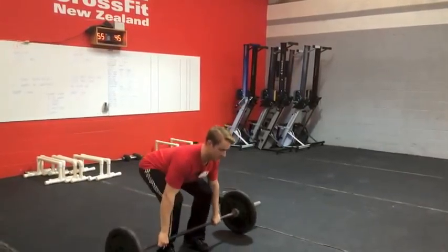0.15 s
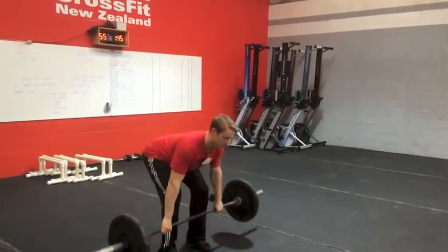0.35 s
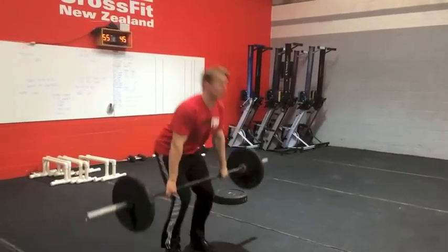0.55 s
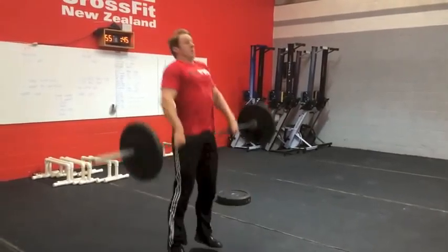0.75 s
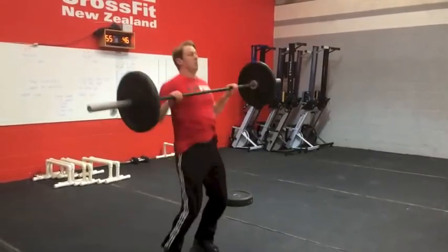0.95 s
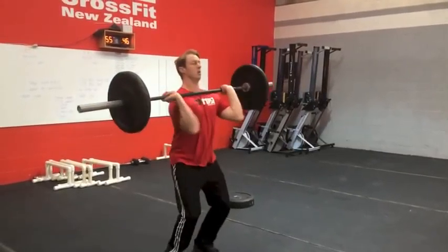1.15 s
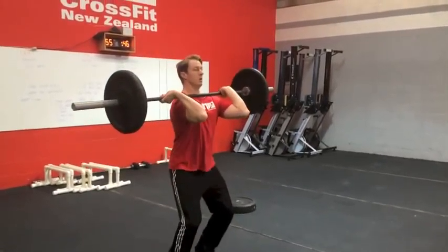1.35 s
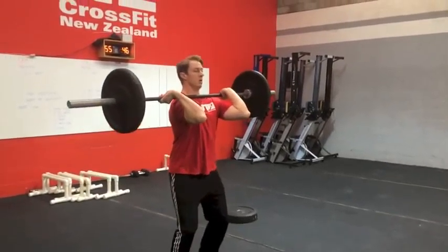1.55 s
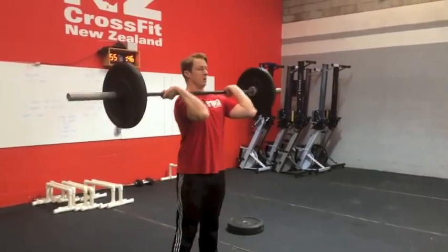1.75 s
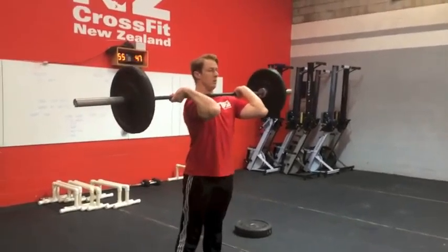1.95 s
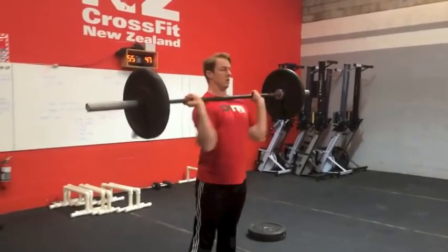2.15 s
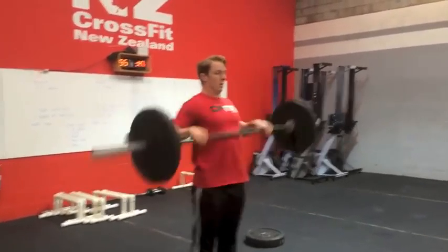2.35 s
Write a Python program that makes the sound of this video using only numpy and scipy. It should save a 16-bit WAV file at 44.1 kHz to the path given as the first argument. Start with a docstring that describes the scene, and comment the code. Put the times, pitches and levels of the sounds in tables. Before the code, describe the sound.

Over low ventilation rumble, barbell sleeves and plates clank hard and rattle away, feet slap the floor, the bar settles quietly, and duller clinks end it, heard by a mono microphone in a large ringing room.

```python
"""First a low ventilation rumble and the last of an earlier clank, dying away in a large hard gym hall.
Then a loaded barbell leaves the rubber floor: slack sleeves and plate hubs clank hard and rattle on, the shoes
stamp down under the catch, and the steel clinks as the bar settles and later leaves the shoulders.
Air is shaped noise, steel is random impacts on a ringing body, shoes and floor are short decaying tones.
One mono pickup takes the direct sounds and the hall, which rings for about a second."""
import sys
import numpy as np
from scipy import signal
from scipy.io import wavfile
from scipy.ndimage import uniform_filter1d

SR = 44100
rng = np.random.default_rng(int(sys.argv[2]) if len(sys.argv) > 2 else 0)


def wav_out(sig):
    """Save sig, one row per channel (or a flat mono array), as 16-bit PCM at SR to the path in sys.argv[1]."""
    wavfile.write(sys.argv[1], SR, np.round(np.clip(np.atleast_2d(sig).T, -1, 1) * 32767).astype(np.int16))


def volts(x):
    """Linear amplitude factor 10**(x/20) for a level x in dB, scalar or array-like."""
    e = np.asarray(x, float) / 20
    return 10 ** e


N = 110250  # 2.5 s


def evened(x):
    """Scales a signal to rms 1."""
    return x / np.sqrt(np.mean(x ** 2) + 1e-20)


def read(points, hz):
    """Reads a (Hz, value) table along log frequency."""
    f, value = np.transpose(points)
    return np.interp(np.log(hz + 1), np.log(f + 1), value)


def add(mix, s, sound):
    """Mixes a sound in at s seconds, cut off at the end of the mix."""
    part = mix[round(s * SR):][:len(sound)]
    part += sound[:len(part)]


def causal(db):
    """Minimum-phase impulse response, energy first, of a gain in dB on 1025 bins."""
    both_sides = np.r_[db, db[-2:0:-1]]
    log_gain = np.log(volts(np.maximum(both_sides, -100)))
    return np.fft.ifft(np.exp(np.conj(signal.hilbert(log_gain)))).real[:1024]


def dulled(x, db_per_octave, ring_hz=1000, ring_db=0):
    """Tilts the treble above 1 kHz and lifts a narrow region around one ring."""
    width_octaves = 0.23
    octave = np.log2(np.fft.rfftfreq(2048, 1 / SR) / 1000 + 1e-3)  # octaves above 1 kHz
    bump = np.exp(-.5 * ((octave - np.log2(ring_hz / 1000)) / width_octaves) ** 2)
    gain_db = db_per_octave * np.maximum(octave, 0) + ring_db * bump
    return signal.oaconvolve(x, causal(gain_db))


# Colour of the ventilation air in the hall, before its overall level is set.
# Each row: frequency in Hz, relative density in dB per Hz.
AIR_COLOUR = [(12, -59.5), (20, -18), (92, -0.5), (202, -5.5), (324, -16.5), (352, -15.5), (597, -21),
              (649, -19.5), (1230, -23.5), (2030, -22.5), (2540, -33.5), (2760, -30.5), (5380, -38.5),
              (13900, -44), (15500, -48.5)]


def ventilation():
    """Steady noise, mostly rumble, a little patchy over time and frequency."""
    level_db, patchy_db, swell_db = -56, .8, .3
    frames, hz = N // 512 + 5, np.fft.rfftfreq(2048, 1 / SR)
    real, imaginary, patches = rng.standard_normal((frames, 1025, 3)).T
    patches = uniform_filter1d(patches, size=10, axis=0)  # across frequency
    patches = evened(uniform_filter1d(patches, size=6, axis=1))  # across time
    swell = evened(uniform_filter1d(rng.standard_normal(frames), size=12))
    gain_db = read(AIR_COLOUR, hz)[:, None] + patchy_db * patches + swell_db * swell
    spectrum = (real + 1j * imaginary) * volts(gain_db)
    noise = signal.istft(spectrum, nperseg=2048, noverlap=1536)[1][:N]
    return volts(level_db) * evened(noise)


# Contact colour of steel on steel, shared by the earlier clank and the barbell at hand.
# Each row: frequency in Hz, relative density in dB per Hz.
STEEL_COLOUR = [(150, -43.5), (300, -24), (450, -17), (600, -9), (900, -18), (1050, -9.5), (1250, -8.5),
                (1370, -11.5), (1800, -2.5), (2300, -8), (2900, -6), (4200, -9), (4900, -7), (5500, -9),
                (5800, -12), (6300, -10.5), (7000, -11.5), (7600, -14), (7950, -13.5), (10100, -20),
                (12000, -17.5), (13400, -37), (14300, -18), (15500, -37)]


def steel_click():
    """The bright, short response of one steel contact."""
    return causal(read(STEEL_COLOUR, np.fft.rfftfreq(2048, 1 / SR)))


def earlier_ring():
    """The hall still dying away from an earlier clank: dulled steel-coloured noise, fading."""
    start_db, t60_s, dull_db_per_octave = -65, 1.8, -2.5
    noise = signal.oaconvolve(rng.standard_normal(N), steel_click())
    wash = dulled(noise, dull_db_per_octave)[:N]
    return volts(start_db - 60 * np.arange(N) / SR / t60_s) * evened(wash)


# How long the hall holds each band; anything under 0.05 s is raised to that.
# Each row: frequency in Hz, decay time t60 in seconds before the early boost.
HALL_DECAY = [(120, .4), (300, 1.9), (700, 1.186), (1500, 0.96), (3000, 1.457), (5000, 1.297), (8000, 0.95),
              (12000, 0.52), (15000, 0.3)]
# Single echoes off the hall's walls.
# Each row: delay in seconds, level in dB before the bass is thinned.
WALL_ECHOES = [(.0065, -15.5), (.0212, -7.5), (.031, -10.5), (.037, -12), (.044, -15.5), (.057, -13)]


def hall(x):
    """Single wall echoes and a dense tail whose bands die at their own speeds."""
    wet_db, gap_s, build_s = -2, .012, 0.0027
    early_db, early_s = 7, .04  # the first reflections stand above the late tail and fall away faster
    tail = np.zeros(2 * SR)
    slots = np.arange(0, 2 * SR - 20, 20)
    # one reflection of random sign somewhere in every 20 samples
    tail[slots + rng.integers(0, 20, len(slots))] = rng.choice([-1., 1.], len(slots))
    hz, t, z = signal.stft(tail, SR, nperseg=512)
    t60 = np.maximum(read(HALL_DECAY, hz), .05)[:, None]
    tail = signal.istft(z * volts(-60 * t / t60), SR, nperseg=512)[1]
    t = np.arange(len(tail)) / SR
    tail = tail * (1 - np.exp(-np.maximum(t - gap_s, 0) / build_s))
    tail = tail * volts(early_db * np.exp(-t / early_s))
    tail = volts(wet_db) * tail / np.linalg.norm(tail)
    soft_tap = np.r_[.25, .5, .25, np.zeros(200)]
    echo = signal.lfilter(*signal.butter(2, 1370, "high", fs=SR), soft_tap)  # walls return little bass
    for k, (s, db) in enumerate(WALL_ECHOES):
        add(tail, s, (-1) ** k * volts(db) * echo)
    return signal.fftconvolve(x, tail)[:N]


# The plates and floor flex as the load is taken up.
# Each row: start in seconds, level in dB before the soft onset and gain, pitch in Hz, t60 in seconds.
FLEXES = [(.216, -39.5, 170, 0.11), (0.223, -41, 298.3, 0.063), (.236, -36, 125, 0.11),
          (.254, -34.5, 190, .1), (.272, -24.5, 105, 0.052)]


def thuds():
    """Plates and floor flexing: low decaying tones with a soft onset."""
    out, t = np.zeros(N), np.arange(SR // 2) / SR
    for s, db, hz, t60 in FLEXES:
        onset = 1 - np.exp(-t / 0.016)
        add(out, s, 4 * volts(db - 60 * t / t60) * onset * np.sin(2 * np.pi * hz * t))
    return out


# Short dull knocks of shoes and rubber on the floor.
# Each row: start in seconds, level in dB before doubling, pitch in Hz, t60 in seconds,
# level of the snap in dB before it is coloured.
SHOE_KNOCKS = [(0.2189, -14, 860, 0.0045, -26), (.2222, -16, 636, 0.003, -50),
               (0.9807, -25, 911, 0.0054, -37), (0.996, -16.5, 1180, 0.0033, -15.5),
               (2.3452, -43, 650, 0.0088, -47.5)]


def knocks():
    """Shoes and rubber: a fast-dying low tone with a tiny bright snap."""
    out, t = np.zeros(N), np.arange(SR // 20) / SR
    tap = 1. * (np.arange(len(t)) == 8)
    for s, db, hz, t60, snap_db in SHOE_KNOCKS:
        snap = volts(snap_db) * dulled(tap, -2, ring_hz=3800, ring_db=7)[:len(t)]
        onset = np.minimum(t * hz * 2, 1)  # half a cycle
        tone = 2 * volts(db - 60 * t / t60) * onset * np.sin(2 * np.pi * hz * t)
        add(out, s, tone + snap)
    return out


# Modes of the bar and hubs, before the hands limit how long they ring.
# Each row: frequency in Hz, relative level in dB, t60 in seconds.
STEEL_MODES = [(1830, -11.5, 0.42), (2750, -10, 0.62), (3080, 6, 0.77), (3720, -13, 4.3), (3860, 0, 0.94),
               (4355, -7, 0.36), (4220, -6, 0.93), (4300, -11.5, 0.85), (5000, -8.5, 0.3),
               (5300, -12, 0.61), (6272, -25.5, 0.77), (6800, -20.5, 1.0), (7305, -22.5, 0.82),
               (8600, -28.5, 0.94)]


def steel_body():
    """One impact on the steel: a coloured click and long thin rings, damped by the hands."""
    ring_db, grip_t60_s = -19, .45  # the hands damp every ring to at most this t60
    t = np.arange(SR) / SR
    click = np.pad(steel_click(), (0, SR - 1024))
    rings = np.zeros(SR)
    for hz, db, t60 in STEEL_MODES:
        rings += volts(db - 60 * t / np.clip(t60, .1, grip_t60_s)) * np.sin(2 * np.pi * hz * t)
    body = evened(click) + volts(ring_db) * evened(rings)
    return body / np.linalg.norm(body)


def taps(count, per_s):
    """Random little impacts of either sign, a few of them large."""
    spread_db = 2  # per e-fold of rarity
    chance, size, sign = rng.random((count, 3)).T
    strength = volts(-spread_db * np.log(size + 0.0033))
    return (chance < per_s / SR) * strength * np.sign(sign - .5)


# Steel clanks of sleeves and plate hubs, as blows that drive the steel body.
# Each row: start in seconds, level in dB before colouring, chatter decay constant in seconds,
# treble tilt in dB per octave above 1 kHz (negative is duller), favoured ring in Hz.
STEEL_CLANKS = [(0.2246, -19, 0.0069, 1.6, 6500), (0.2293, -24, 0.011, 2.15, 12500),
                (0.2316, -22.5, 0.013, 1.7, 3530), (0.2383, -20, 0.018, -2, 1200),
                (0.2482, -14.5, 0.0034, 1.46, 4700), (0.258, -18.5, 0.021, -5.5, 1220),
                (.281, -29, 0.02, 1.1, 2945), (1.009, -36.5, 0.038, -4.5, 650),
                (1.1365, -40.5, 0.0045, -1.5, 2960), (1.161, -59, 0.004, 2.6, 12100),
                (1.188, -55, 0.044, -2.4, 6760), (1.301, -44, 0.013, -5, 627),
                (1.698, -50.5, 0.0014, -5.2, 4480), (2.377, -31.5, 0.025, -5.5, 850),
                (2.388, -33, 0.0072, -5, 1900), (2.409, -45, 0.0071, -2.1, 6800),
                (2.419, -42, 0.0062, -2.5, 4900), (2.465, -51, 0.025, -3.5, 2430)]


def clank_blows():
    """Each clank is a burst of chattering contacts, quick to rise and dying exponentially."""
    blows, t = np.zeros(N), np.arange(SR // 8) / SR
    for s, db, length, tilt_db, ring_hz in STEEL_CLANKS:
        rise = np.minimum(t / (0.12 * length), 1)
        burst = evened(taps(len(t), 9000)) * rise * np.exp(-t / length)
        add(blows, s, volts(db) * dulled(burst, tilt_db, ring_hz, ring_db=10.5))
    return blows


# Loose sleeves rattling while the bar rises, then fading out; silent outside the rows.
# Each row: time in seconds, level in dB before colouring.
SLEEVE_RATTLE = [(.27, -40.5), (.33, -31), (.4, -39), (0.461, -43.5), (.52, -42.5), (0.599, -39.5),
                 (0.701, -44), (0.779, -54.5), (.85, -58.5), (0.922, -61.5), (.99, -52), (1.03, -54.5),
                 (1.2, -56), (1.349, -64), (1.599, -74.5)]


def rattle_blows():
    """Sparser contacts than a clank, softened at the top, following the rattle's level."""
    s, db = np.transpose(SLEEVE_RATTLE)
    level = volts(np.interp(np.arange(N) / SR, s, db, -200, -200))
    contacts = evened(taps(N, 2500))
    softened = signal.lfilter(*signal.butter(2, 6500, fs=SR), contacts)
    return dulled(level * softened, -0.73, ring_hz=2574, ring_db=3.7)[:N]


def barbell():
    """Clanks and rattle strike the same steel, so both ring with its modes."""
    return signal.oaconvolve(clank_blows() + rattle_blows(), steel_body())[:N]


# Share of the steel that reaches the hall, less once the bar is held against the body.
# Each row: time in seconds, level in dB.
BAR_OPENNESS = [(0.898, -1), (1.1, -3), (2.299, -6.5)]


def scene():
    """Direct sounds at the pickup, plus their hall, the earlier ring and the rumble."""
    bar, feet, low = barbell(), knocks(), thuds()
    openness_db = np.interp(np.arange(N) / SR, *np.transpose(BAR_OPENNESS))
    send = bar * volts(openness_db) + volts(-3) * feet + volts(-6.5) * low
    return (bar + feet + low + hall(send) + earlier_ring() + ventilation())[None]


def roll_off(x):
    """The treble ends steeply here."""
    return signal.sosfilt(signal.butter(12, 16500, fs=SR, output="sos"), x)


def record(dry):
    """Limits the top of the band with a steep low-pass at 15.7 kHz to finish the mix."""
    low_pass = signal.firwin(161, 15700, window=("kaiser", 7), fs=SR)[None]
    mix = signal.oaconvolve(dry, low_pass, "same")
    return roll_off(mix)


dry = scene()
out = record(dry)
wav_out(out)
```